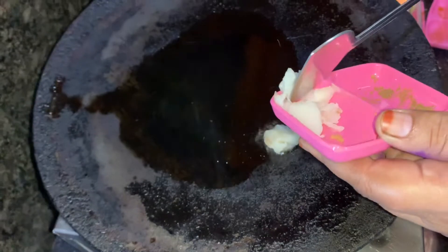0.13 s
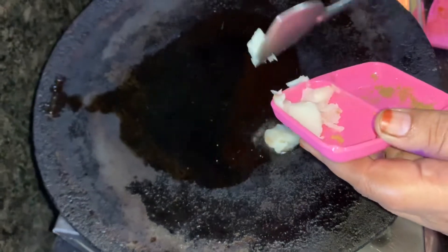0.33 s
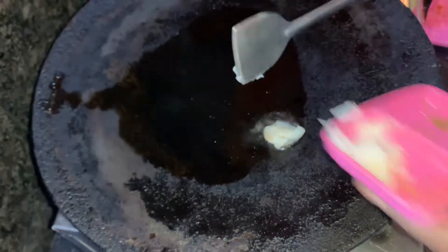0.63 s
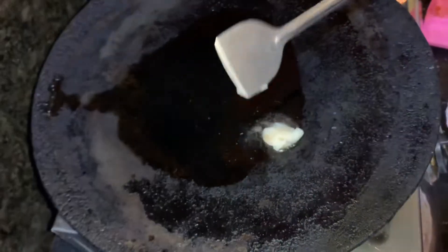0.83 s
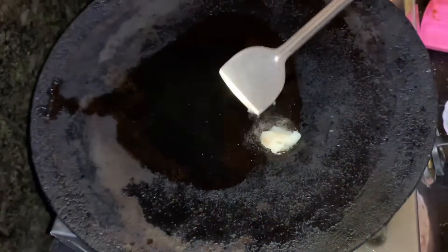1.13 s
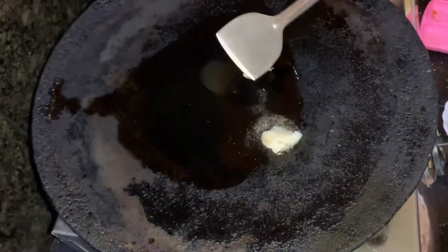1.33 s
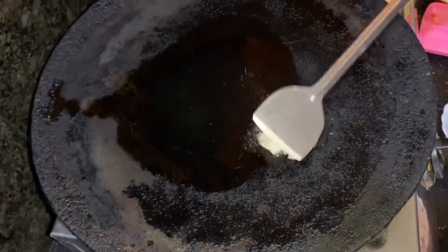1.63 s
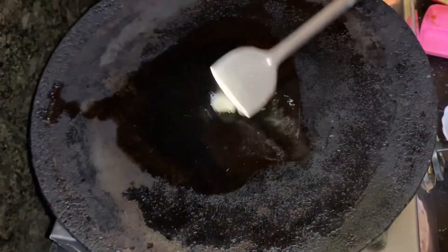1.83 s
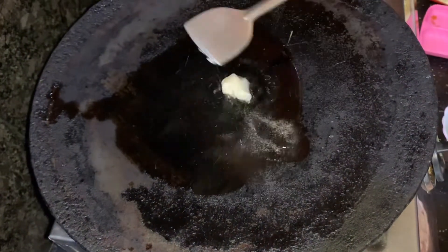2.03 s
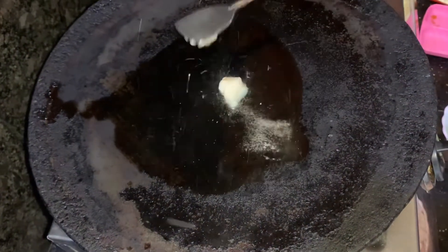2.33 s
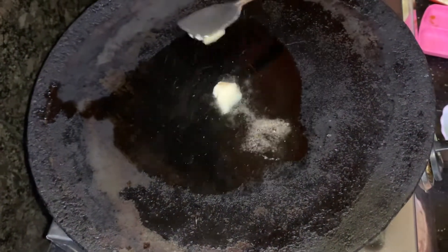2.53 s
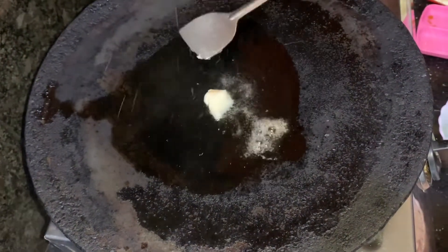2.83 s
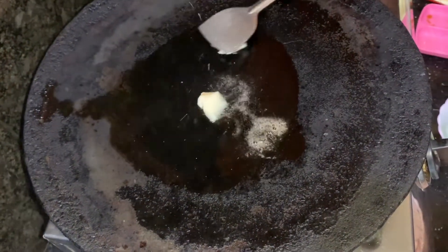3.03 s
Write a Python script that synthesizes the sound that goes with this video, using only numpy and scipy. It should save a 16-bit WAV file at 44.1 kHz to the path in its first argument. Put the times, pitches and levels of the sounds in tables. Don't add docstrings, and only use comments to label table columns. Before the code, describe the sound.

Fat sizzles and spits in a hot iron pan as a steel spatula clanks against it.

```python
import sys
import numpy as np
from scipy import signal
from scipy.fft import rfft, irfft
from scipy.io import wavfile
from scipy.ndimage import uniform_filter1d

SR = 44100
rng = np.random.default_rng(int(sys.argv[2]) if len(sys.argv) > 2 else 0)


def dump_mix(stems):
    frames = np.atleast_2d(stems).T
    limited = np.clip(frames, -1, 1)
    pcm = np.round(limited * 32767).astype(np.int16)
    wavfile.write(sys.argv[1], SR, pcm)


def to_linear_factor(level_db):
    exponent = np.asarray(level_db, float) / 20
    return 10 ** exponent


N = 140238

# (frequency [Hz], level [dB], time to fade by 60 dB [s])
PAN_MODES = [(1232, -10, .45), (1892, -9, .1), (1922, -3, .13), (2042, 0, .32), (2254, -6, .4),
             (2450, -10, .2), (2927, -10, .3)]
# (frequency [Hz], level [dB])
FINE_COLOUR = [(1000, -32.5), (2300, -20), (4600, -6.5), (5400, 1.5), (6600, -4), (8100, 1), (10500, 0),
               (15500, -4.5)]
# (frequency [Hz], level [dB])
COARSE_COLOUR = [(300, -25), (900, -14), (1600, -4), (2300, -6.5), (3600, 5.5), (5000, 12), (7000, 2),
                 (12000, -65)]
# (frequency [Hz], level [dB])
SNAP_COLOUR = [(500, -80), (1200, -8), (4000, -12.5), (6000, 5), (11000, 6), (15500, 0)]


def evened(x):
    return x / np.sqrt(np.mean(x ** 2) + 1e-20)


def read(points, hz):
    f, value = np.transpose(points)
    return np.interp(np.log(hz + 1), np.log(f + 1), value)


def coloured(x, spectrum):
    gain = to_linear_factor(read(spectrum, np.fft.rfftfreq(len(x), 1 / SR)))
    return irfft(rfft(x) * gain, len(x))


def add(mix, s, sound):
    part = mix[round(s * SR):][:len(sound)]
    part += sound[:len(part)]


def drift(hz):
    slowness = 1 + (np.fft.rfftfreq(N, 1 / SR) / hz) ** 2
    wobble = irfft(rfft(rng.standard_normal(N)) / slowness, N)
    return evened(wobble - wobble.mean())


def burst(hz, noise, t60, ring_t60, ring_db):
    rise_s = .0005
    t = np.arange(len(noise)) / SR
    puff = noise * to_linear_factor(-60 * t / t60)
    ring = to_linear_factor(ring_db - 60 * t / ring_t60) * np.sin(2 * np.pi * hz * t * (1 + 8 * t))
    sound = (puff + ring) * (1 - np.exp(-t / rise_s))
    return sound / abs(sound).max()


def bubbles(per_s, spread_db, lo_hz, hi_hz, t60, ring_db, clump_db, count=16):
    rate = per_s * to_linear_factor(clump_db * drift(25))
    bursts_now = rng.random(N) < rate / SR
    size = to_linear_factor(spread_db * np.minimum(rng.exponential(1, N), 2.6)) * bursts_now
    kind = rng.integers(0, count, N)
    out = np.zeros(N)
    for k, hz in enumerate(np.geomspace(lo_hz, hi_hz, count)):
        sound = burst(hz, rng.standard_normal(512), t60, 0.88 * t60, ring_db)
        out += signal.oaconvolve(size * (kind == k), sound)[:N]
    return evened(out)


def sizzle():
    # (time [s], fine sizzle level [dB], coarse sputter level [dB])
    heat = [(0.0, -47, -46.5), (.13, -42.5, -50.5), (.42, -35.5, -51.5), (.7, -39.5, -51),
            (.94, -41, -53.5), (1.2, -32.5, -49.5), (1.55, -35.5, -46.5), (1.72, -42.5, -45.5),
            (1.9, -27.5, -41), (2.07, -26.5, -38), (2.22, -29, -37), (2.451, -28.5, -30),
            (2.84, -29, -36.5), (3.18, -30, -29)]
    heat_s, fine_points, coarse_points = np.transpose(heat)
    t = np.arange(N) / SR
    fine_db = np.interp(t, heat_s, fine_points)
    coarse_db = np.interp(t, heat_s, coarse_points)

    hiss = rng.standard_normal(N) * to_linear_factor(2.36 * drift(75))
    fizz = bubbles(380, 4.5, 5150, 10030, t60=0.0078, ring_db=1.76, clump_db=4.5)
    fine = evened(coloured(to_linear_factor(-2) * hiss + fizz, FINE_COLOUR))

    sputter = bubbles(220, 4.9, 1380, 5130, t60=.003, ring_db=-13.5, clump_db=5.5)
    coarse = evened(coloured(to_linear_factor(-3.5) * rng.standard_normal(N) + sputter, COARSE_COLOUR))

    snaps = bubbles(70, 2.6, 4850, 15900, t60=0.0027, ring_db=-4.8, clump_db=5.0)
    crackle = to_linear_factor(-37) * evened(coloured(snaps, SNAP_COLOUR))
    return to_linear_factor(fine_db + 2.5) * fine + crackle, to_linear_factor(coarse_db + 3.5) * coarse


def single_bursts(table, spectrum, gain_db, t60, ring_t60, ring_db):
    lead = 64
    out = np.zeros(N)
    for s, db, hz in table:
        puff = rng.standard_normal(1024)
        sound = np.pad(burst(hz, puff, t60, ring_t60, ring_db), (lead, 0))
        sound = coloured(sound, spectrum)
        add(out, s - lead / SR, to_linear_factor(db + gain_db) * sound / abs(sound).max())
    return out


def spits():
    # (time [s], peak level [dB], ring frequency [Hz])
    spit_events = [(0.025, -19.5, 7800), (0.064, -22, 6580), (0.1446, -37, 6630), (0.1591, -19, 7810),
                   (0.2597, -16, 6740), (0.308, -18, 6700), (0.324, -13.5, 5400), (0.3514, -12.5, 6430),
                   (0.4596, -15.5, 7900), (0.5917, -18.5, 6500), (0.6033, -14, 6350), (0.7846, -29, 7660),
                   (0.8043, -17, 5430), (0.8389, -17.5, 6200), (0.8702, -25, 6480), (0.9586, -25, 7500),
                   (0.9784, -15, 6370), (1.02, -17, 6370), (1.0382, -22, 6300), (1.054, -13, 6180),
                   (1.063, -12, 6500), (1.1078, -13, 6500), (1.1877, -19, 8060), (1.2161, -7.5, 7010),
                   (1.288, -13.5, 6700), (1.3156, -8.5, 6680), (1.3754, -9.5, 5650), (1.4038, -14, 6500),
                   (1.449, -35, 7990), (1.4634, -32, 7800), (1.515, -24, 6030), (1.5353, -20.5, 6640),
                   (1.6332, -21, 6590), (1.6454, -9, 5260), (1.6594, -5, 6270), (1.732, -22, 7200),
                   (1.7718, -16, 5670), (1.823, -20.5, 6140), (1.896, -28, 7370), (1.9778, -20, 6700),
                   (2.0298, -17.5, 6050), (2.0905, -21, 7400), (2.2453, -14, 6740), (2.276, -13, 6900),
                   (2.3925, -22, 6600), (2.4373, -22, 6440), (2.4887, -12, 7300), (2.5972, -11, 5940),
                   (2.6455, -11.5, 6620), (2.6943, -21, 7800), (2.7125, -17, 7610), (2.7345, -13, 6500),
                   (2.7531, -13, 6300), (2.7885, -22, 7540), (2.835, -12, 7700), (2.9133, -17, 7330),
                   (2.9657, -16, 6400), (3.047, -15, 6400), (3.0717, -12.5, 5630), (3.1403, -14.5, 6600)]
    return single_bursts(spit_events, FINE_COLOUR, 3.26, t60=.003, ring_t60=.005, ring_db=0.23)


def pops():
    # (time [s], peak level [dB], ring frequency [Hz])
    pop_events = [(0.161, -30, 2830), (0.424, -29.5, 4060), (0.72, -21, 3490), (0.803, -25.5, 4230),
                  (0.871, -23.5, 4200), (1.189, -13.5, 4310), (1.261, -19, 4550), (1.435, -31, 3800),
                  (1.512, -23.5, 2770), (1.537, -14.5, 4370), (1.604, -18.5, 4100), (1.745, -17, 4240),
                  (1.834, -9, 3790), (1.844, -17, 3330), (2.16, -14, 3370), (2.275, -5, 3550),
                  (2.629, -19, 4130), (2.646, -8, 3570), (2.704, -17.5, 3530), (2.756, -14, 2900),
                  (2.867, -18, 4030), (2.939, -18, 3860), (3.024, -13.5, 2860), (3.051, -11.5, 3520),
                  (.0558, -25.5, 3820), (.7083, -38, 3080), (1.0515, -26.5, 4060), (1.3144, -24.5, 4240),
                  (1.4626, -27, 3700), (1.7729, -26, 3550), (1.9205, -24, 2890), (2.0353, -16.5, 1770),
                  (2.0672, -23, 4480), (2.385, -30, 3830), (2.7407, -19, 4050), (2.7646, -12.5, 2110),
                  (2.8205, -15.5, 4480), (2.8499, -15.5, 4200), (2.8863, -16, 3690), (3.1507, -15, 2090)]
    return single_bursts(pop_events, COARSE_COLOUR, 1.68, t60=0.013, ring_t60=0.013, ring_db=-6.0)


def ticks():
    # (time [s], peak level [dB])
    tick_events = [(0.0241, -14), (0.1491, -20), (0.3644, -16), (0.4096, -20), (0.4248, -15.5),
                   (0.542, -18.5), (0.5896, -16.5), (0.7068, -30), (0.8543, -21), (0.8717, -9.5),
                   (0.925, -26), (1.039, -33), (1.053, -33), (1.1072, -23), (1.1598, -19), (1.1883, -25),
                   (1.2, -15.5), (1.2166, -12), (1.293, -13.5), (1.4213, -18), (1.4476, -40), (1.4638, -12),
                   (1.5396, -20), (1.7407, -16), (1.835, -16), (1.8806, -27), (1.8965, -15.5), (1.946, -15),
                   (2.0078, -11.5), (2.0693, -7.5), (2.105, -15), (2.1752, -12), (2.595, -20), (2.676, -26),
                   (2.7295, -16), (2.7825, -16), (2.8195, -32), (2.9228, -15), (2.9679, -10), (2.9831, -16),
                   (3.029, -22), (3.1386, -15)]
    pitched = [(s, db, 11000) for s, db in tick_events]
    return single_bursts(pitched, SNAP_COLOUR, 5.0, t60=.002, ring_t60=.002, ring_db=-5.0)


def pan_wall(x):
    # (delay [s], level [dB])
    echoes = [(.0007, -18), (.0019, -21), (.0027, -16.5), (.0045, -16)]
    wall = np.zeros(512)
    wall[0] = 1
    for s, db in echoes:
        wall[round(s * SR)] = to_linear_factor(db)
    return signal.oaconvolve(x, wall / np.linalg.norm(wall))[:N]


def spatula():
    # (time [s], peak level [dB], thud level [dB], ring level [dB])
    knocks = [(1.7853, -14, -33.5, -4), (2.2458, -8, -29, -2.5), (2.2744, -13, -26, -9),
              (2.2834, -13, -28, -7), (2.2974, -25.5, -25, 19), (2.3311, -13.5, -35, -3),
              (2.3384, -20, -24.5, -19), (2.4204, -8, -42, -6.5), (2.4384, -11, -51, -13),
              (2.4563, -15, -32, 6.5), (2.4674, -16.5, -35, 5), (2.5287, -24, -40, 7),
              (2.7487, -30, -51, 9.5), (3.112, -29.5, -43, 11.5)]
    touches = [1.83, 2.365, 2.58, 2.81, 3.3]
    damping_s, rattle_db, rattle_t60 = .015, -18, .1
    blows, thuds, rings = np.zeros(N), np.zeros(N), np.zeros(N)
    t = np.arange(2048) / SR
    long_t = np.arange(SR // 2) / SR
    for s, db, thud_db, ring_db in knocks:
        scrape, push = rng.standard_normal((2, 2048))
        rough = scrape * (to_linear_factor(-60 * t / 0.005) + to_linear_factor(rattle_db - 60 * t / rattle_t60))
        clack = np.sin(2 * np.pi * 2000 * t) * to_linear_factor(-60 * t / 0.014) + 1.6 * rough
        add(blows, s, to_linear_factor(db + 0.5) * np.minimum(t / 0.001, 1) * clack)

        ring = np.zeros(len(long_t))
        for hz, mode_db, t60 in PAN_MODES:
            spot_db = 2 * rng.uniform(-1, 1)
            ring += to_linear_factor(mode_db + spot_db - 60 * long_t / t60) * np.sin(2 * np.pi * hz * long_t)
        rest_s = min(touch for touch in touches if touch > s) - s
        stilled = np.exp(-np.maximum(long_t - rest_s, 0) / damping_s)
        add(rings, s, to_linear_factor(db - 22 + ring_db) * ring * stilled)

        thud = np.minimum(t / 0.0046, 1) * push * to_linear_factor(-60 * t / 0.34)
        add(thuds, s, to_linear_factor(db + thud_db + 14.0) * thud)
    blows = coloured(blows, [(300, -44), (1100, -5.5), (2000, -2), (4000, 4), (8000, -5.0)])
    thuds = coloured(thuds, [(100, -16), (300, -2.5), (550, -1.5), (900, -5), (4000, -60)])
    return rings + blows, thuds


def pan(x):
    t = np.arange(SR) / SR
    ring = sum(to_linear_factor(db - 60 * t / t60) * np.sin(2 * np.pi * hz * t) for hz, db, t60 in PAN_MODES)
    return signal.fftconvolve(x, ring / np.linalg.norm(ring))[:N]


def flame():
    # (frequency [Hz], level [dB])
    flutter_colour = [(12, -3), (20, -2.5), (87, 0), (112, 0), (229, -12), (270, -13), (318, -20),
                      (1000, -17), (1300, -90), (2200, -120)]
    # (time [s], level [dB])
    gas = [
        (0, -2),
        (.9, -2),
        (1.9, 1),
        (2.2, -1),
        (2.5, 0.5),
        (3.18, 1),
    ]
    flutter_db, roar_hz, roar_width_hz, roar_db = -56, 74.5, 7, -56.5
    last_db = flutter_colour[-1][1]
    colour = list(flutter_colour) + [(3000, last_db - 20)]
    flutter = to_linear_factor(flutter_db) * evened(coloured(rng.standard_normal(N), colour))
    hz = np.fft.rfftfreq(N, 1 / SR)
    roar = irfft(rfft(rng.standard_normal(N)) / (1 + ((hz - roar_hz) / roar_width_hz) ** 2), N)
    strength_db = np.interp(np.arange(N) / SR, *np.transpose(gas))
    return (flutter + to_linear_factor(roar_db) * evened(roar)) * to_linear_factor(strength_db)


def kitchen(x):
    t60 = 0.13
    t = np.arange(SR // 4) / SR
    tail = rng.standard_normal((2, len(t))) * to_linear_factor(-60 * t / t60) * (t > .003)
    return signal.fftconvolve(x[None], tail / np.linalg.norm(tail[0]), axes=1)[:, :N]


def ports(x):
    delay_s, knee_hz, bend_hz = .00024, 2730, 1100
    over = np.fft.rfftfreq(N, 1 / SR) - knee_hz
    turn = np.pi * delay_s * (np.sqrt(over ** 2 + bend_hz ** 2) + over)
    return np.array([x, irfft(rfft(x) * np.exp(-1j * (turn - turn[0])), N)])


def scatter(x):
    z = signal.stft(x, nperseg=128)[2]
    turn = np.exp(2j * np.pi * rng.random((2,) + z.shape))
    both = signal.istft(z * turn, nperseg=128)[1]
    return np.pad(both, ((0, 0), (0, 128)))[:, :N]


def join(x):
    # (start [s], end [s])
    joined = [(.22, .29), (.43, .48), (.53, .55), (.61, .67), (1.11, 1.15), (1.23, 1.28), (1.55, 1.69),
              (1.775, 1.81), (1.84, 1.875), (1.91, 2.08), (2.13, 2.57), (2.64, 2.67), (2.71, 2.78),
              (2.85, 2.96), (2.985, 3.13), (3.165, 3.2)]
    # (frequency [Hz], level [dB])
    winning_lead = [(2000, 14), (4800, 6.5), (7000, 3), (13000, 1.5)]
    sum_and_difference = np.array([x[0] + x[1], x[0] - x[1]]) / 2
    hz, t, z = signal.stft(sum_and_difference, SR, nperseg=512)
    power = uniform_filter1d(abs(z) ** 2, size=6, axis=1)
    power = uniform_filter1d(power, size=7, axis=2)
    in_time = sum((t > a - .016) & (t < b + .014) for a, b in joined)
    on = in_time * (hz > 1500)[:, None] > 0
    patches = rng.standard_normal((len(hz) // 24 + 1, len(t) // 4 + 1))
    wobble_db = 2 * patches.repeat(24, 0)[:len(hz)].repeat(4, 1)[:, :len(t)]
    lead_db = 2 * read(winning_lead, hz)[:, None] + wobble_db
    beaten = on & (power[::-1] > power * to_linear_factor(lead_db))
    mid, side = signal.istft(z * ~beaten, SR, nperseg=512)[1][:, :N]
    return np.array([mid + side, mid - side])


def scene():
    fine, coarse = sizzle()
    blows, thuds = spatula()
    popping = pops()
    fat = pan_wall(fine + coarse + popping + ticks() + spits())
    near = fat + blows + thuds + to_linear_factor(-12) * pan(coarse + 0.58 * popping)
    low = flame()

    air_colour = [(50, -42), (125, -5), (400, 13.0)]
    flame_air = np.array([to_linear_factor(-12) * coloured(flame(), air_colour) for port in "LR"])
    air = kitchen(to_linear_factor(-10.5) * near) + flame_air
    spread = scatter(coloured(near, [(600, 0), (1900, -10.5), (3500, -1.5)]))
    return ports(near + low) + air + to_linear_factor(-4.5) * spread


def roll_off(x):
    return signal.sosfilt(signal.butter(12, 17080, fs=SR, output="sos"), x)


def record(dry):
    ceiling = .9
    edge = signal.firwin(255, 15900, window=("kaiser", 7), fs=SR)
    limited = signal.oaconvolve(ceiling * np.tanh(dry / ceiling), edge[None], "same")
    return roll_off(join(limited))


dry = scene()
out = record(dry)
dump_mix(out)
```